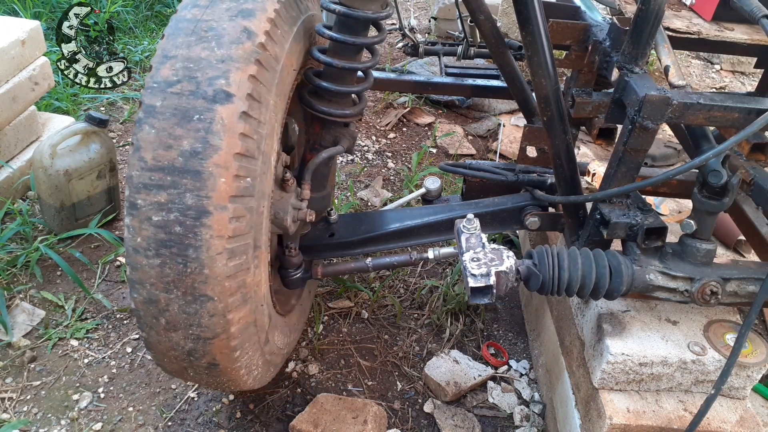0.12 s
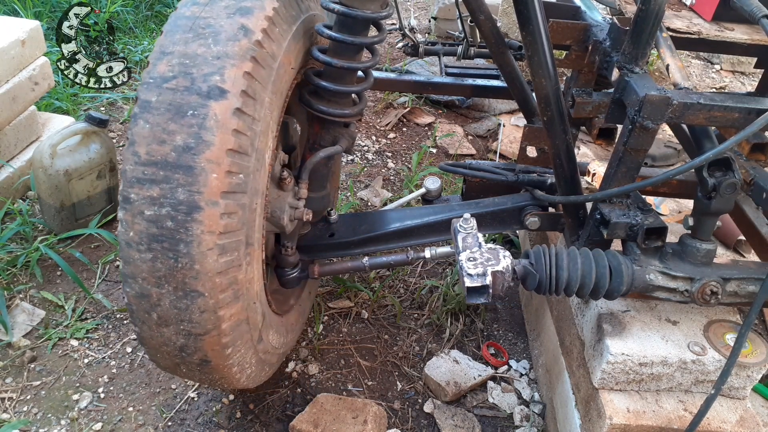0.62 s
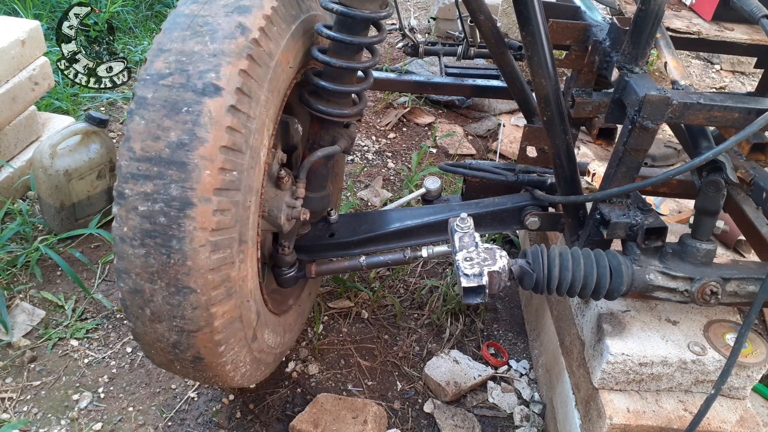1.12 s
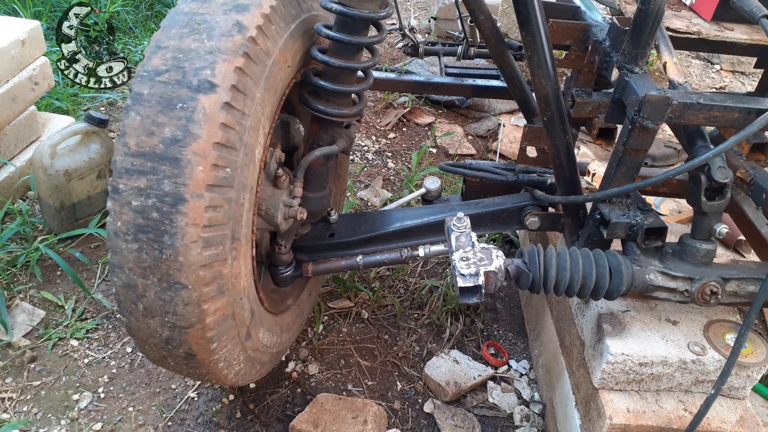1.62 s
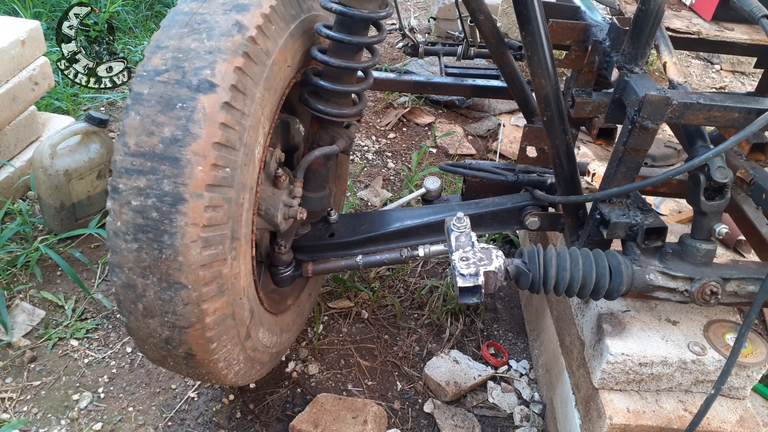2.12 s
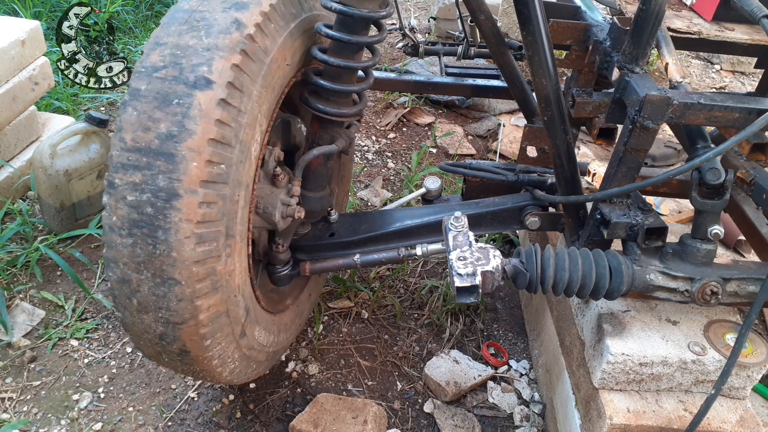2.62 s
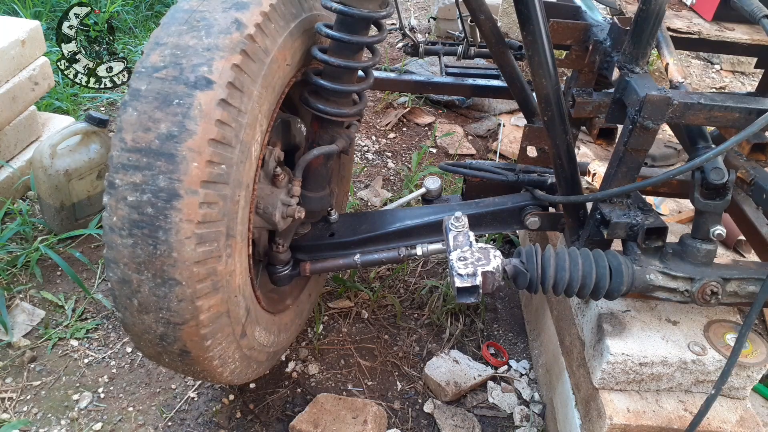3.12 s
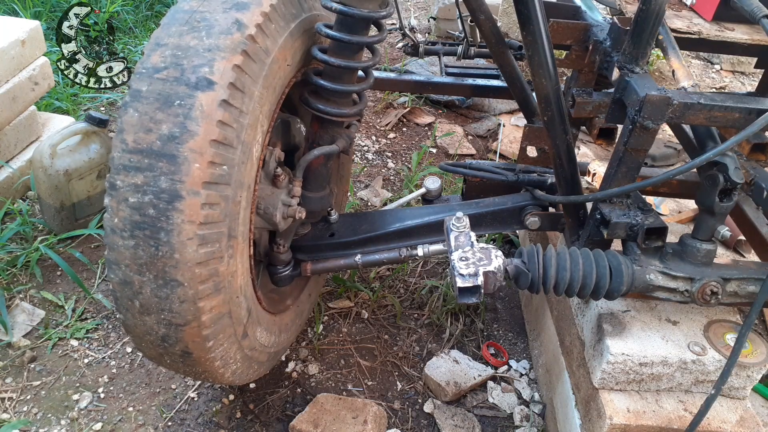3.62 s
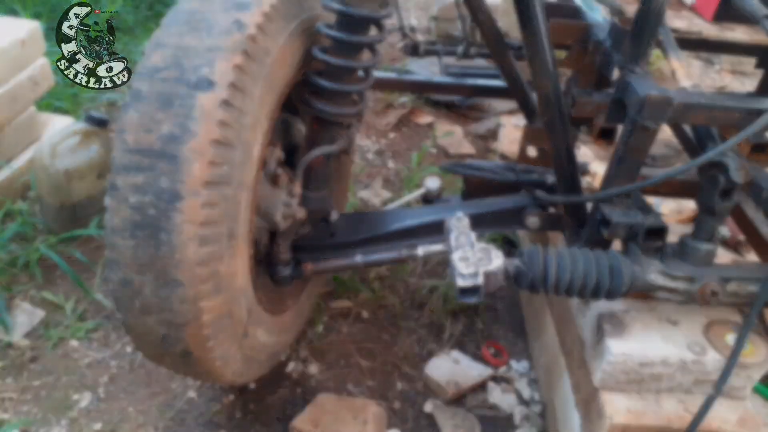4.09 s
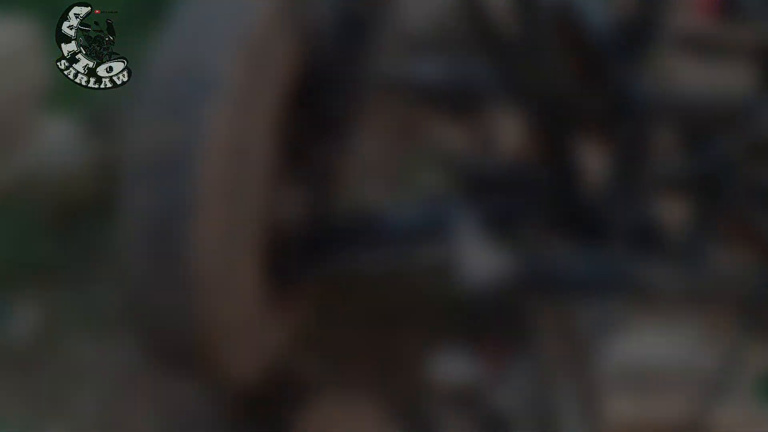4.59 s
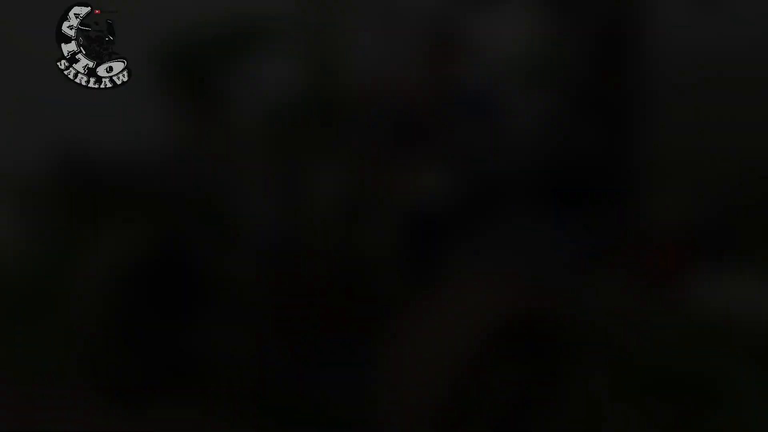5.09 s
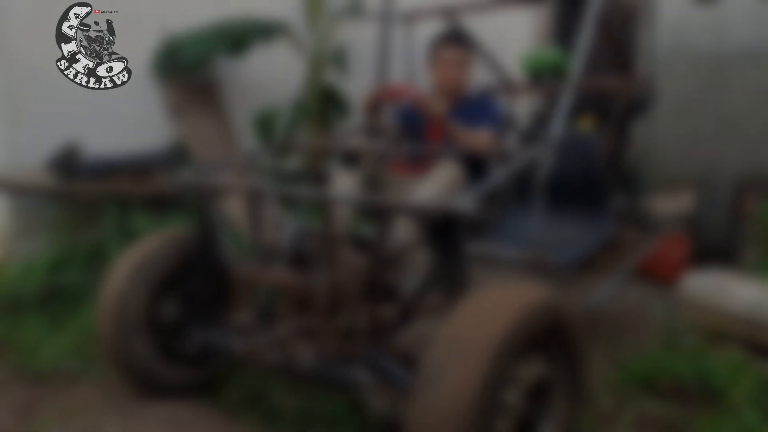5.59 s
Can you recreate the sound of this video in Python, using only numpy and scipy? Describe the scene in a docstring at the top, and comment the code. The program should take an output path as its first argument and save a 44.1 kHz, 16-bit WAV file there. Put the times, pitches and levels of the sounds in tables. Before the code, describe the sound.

A slow, separate putt-putt of a small engine, heard from some way off over faint hiss, with hollow boom and raspy tailpipe bark. Suspension and frame knock over bumps, clanking hardest midway. The engine sags and quietens, then an abrupt edit brings it close: quicker firing, strong boom, rough rush, ringing casing and gliding gear whine, until the end.

```python
"""A small single-cylinder engine putters about a yard some way off, slowing down on the whole. Firing-order
boom with a wall echo, tailpipe bark, rumble and rush follow its speed; filtered noise bursts and decaying
sines make the frame knock and clank over bumps, above a faint hiss. At 5.069 s the sound jumps to the
same engine close by, running faster, with rushing noise, gear whine and clatter ringing the casing."""
import sys
import numpy as np
from scipy import signal
from scipy.fft import rfft, irfft
from scipy.io import wavfile
from scipy.ndimage import uniform_filter1d

SR = 44100
rng = np.random.default_rng(int(sys.argv[2]) if len(sys.argv) > 2 else 0)


def bounce(signal):
    """Save signal as a 16-bit WAV file at the path given by the first command-line argument."""
    frames = np.transpose(np.atleast_2d(signal))
    limited = np.clip(frames, -1, 1)
    pcm = np.round(limited * 32767).astype(np.int16)
    wavfile.write(sys.argv[1], SR, pcm)


def boost(x):
    """Linear amplitude factor 10**(x/20) for a level x in decibels (scalar or array-like)."""
    u = np.asarray(x, float) / 20
    return 10 ** u


N = 252252


def evened(x):
    """Scales to rms 1."""
    return x / np.sqrt(np.mean(x ** 2) + 1e-20)


def read(points, hz):
    """Reads a spectrum on a log frequency axis."""
    f, value = np.transpose(points)
    return np.interp(np.log(hz + 1), np.log(f + 1), value)


def curves(rows, t):
    """Every column of a table at the times t."""
    s, *columns = np.transpose(rows)
    return np.array([np.interp(t, s, c) for c in columns])


def wander(shape, size):
    """Slow random curve of rms 1: white noise averaged over size samples."""
    return evened(uniform_filter1d(rng.standard_normal(shape), size=size))


def resonate(x, hz, width_hz):
    """Two equal resonances of gain 1 in series: each shifts hz to zero, smooths, shifts back."""
    turn = np.exp(2j * np.pi * np.cumsum(hz * np.ones(x.shape[-1])) / SR)
    r = np.exp(-np.pi * width_hz / SR)
    for _ in range(2):
        x = 2 * (turn * signal.lfilter([1 - r], [1, -r], x / turn)).real
    return x


def pair(count):
    """Two white noises whose likeness varies with frequency."""
    # left-right correlation: (frequency [Hz], likeness [-1 to 1])
    likeness = [(60, 0.34), (180, 1), (550, 0.52), (1650, -0.14), (4970, -0.14), (15000, 0.11)]
    a, b = rfft(rng.standard_normal((2, count)))
    same = np.clip(read(likeness, np.fft.rfftfreq(count, 1 / SR)), -1, 1)
    return irfft([a, same * a + np.sqrt(1 - same ** 2) * b], count)


def coloured(x, points):
    """Filters x by the gains of points, then scales to rms 1."""
    gain = boost(read(points, np.fft.rfftfreq(x.shape[-1], 1 / SR)))
    return evened(irfft(rfft(x) * gain, x.shape[-1]))


def cycles(t, part):
    """Firings counted from the start of a stretch, and firing rate in Hz: phase is the integral of rate."""
    # firing rate, far then close: (time [s], rate [Hz])
    firing_rate = [
        [(0.0, 19.59), (0.24, 19.81), (0.48, 18.57), (0.72, 17.91), (0.97, 18.8), (1.21, 17.94), (1.45, 17.88),
         (1.69, 17.91), (1.93, 16.96), (2.17, 15.59), (2.41, 15.44), (2.66, 15.89), (2.9, 15.49), (3.14, 14.7),
         (3.38, 15.66), (3.62, 16.5), (3.86, 16.57), (4.1, 17.27), (4.35, 17.18), (4.59, 16.0), (4.83, 12.9),
         (5.07, 12.2)],
        [(5.07, 22.43), (5.15, 22.51), (5.23, 22.89), (5.31, 23.92), (5.39, 24.67), (5.47, 24.77),
         (5.55, 24.39), (5.63, 23.85), (5.72, 23.29)],
    ]
    # count at the start, far then close: [firings]
    first_turn = [-.14, -.01]
    firing_hz = curves(firing_rate[part], t)[0]
    return first_turn[part] + np.cumsum(firing_hz) / SR, firing_hz


def puffs(turns, length, steady, spread_db):
    """Envelope that leaps at each firing and dies over length [firings]; every firing has its own strength."""
    strength = boost(spread_db * rng.standard_normal(200))[np.floor(turns + 1).astype(int)]
    return steady + strength * uniform_filter1d(np.exp(-(turns % 1) / length), size=120)


def boom(turns, firing_hz, part, boom_db, thud_level_db, lag_ms, echo, swing, smear, ahead):
    """Muffler boom: harmonics of the firing rate in step, each with a delayed wall echo."""
    # strength of the orders by pitch, far then close: (frequency [Hz], level [dB])
    muffler = [
        [(30, -57), (45, -38.5), (65, -34), (85, -9), (97, -1.5), (110, -2.5), (122, -2), (135, -0.5),
         (150, -17), (175, -24.5), (210, -33)],
        [(30, -45.5), (48, -24.5), (72, -19), (85, -18.5), (97, -17), (110, 2.5), (122, -1), (135, -7),
         (150, -18), (172, -9), (200, -20), (260, -26)],
    ]
    muffler_hz = 121.4
    thud_hz, thud_width_hz = 66.1, 7  # a low mode of the pipe
    out = 0
    for k in range(2, 11):
        hz = k * firing_hz
        order_phase = swing + smear * (k - muffler_hz / firing_hz) ** 2  # cycles
        angle = 2 * np.pi * (k * (turns + ahead) + order_phase)
        late = 2 * np.pi * hz * lag_ms / 1000
        thud = boost(thud_level_db) * np.exp(-((hz - thud_hz) / thud_width_hz) ** 2)
        level = boost(boom_db + read(muffler[part], hz)) + thud
        out = out + level * (np.cos(angle) + echo * np.cos(angle - late))
    return out


def bark(valve_turns, pop, mode_db):
    """Exhaust pops and turbulent gas ring the tailpipe modes."""
    # pipe resonances: (frequency [Hz], width of each pass [Hz], level [dB])
    tailpipe = [(178.6, 88, -9), (238.8, 50, -3), (294.3, 48.3, 0.5), (429, 110, -15.5)]
    revs = np.floor(2 * valve_turns + 2).astype(int)  # two crank turns a firing
    strength_db = 0.76 * rng.standard_normal(400) - 5 * (np.arange(400) % 2)  # the idle turn pops weaker
    pops = np.diff(revs, prepend=revs[0]) * boost(strength_db)[revs]
    # gas is harder just after the valve opens
    gas = pair(len(valve_turns)) * puffs(valve_turns, 1.0, 1.0, 1.6)
    drive = pop * evened(pops) + evened(gas)
    modes = tailpipe + [(325.4, 54, mode_db)]  # the last is the upper pipe mode
    return evened(sum((-1) ** k * boost(db) * resonate(drive, hz, width_hz)
                      for k, (hz, width_hz, db) in enumerate(modes)))


def rumble(count, db):
    """Low noise, shaped by a fixed spectrum."""
    # (frequency [Hz], relative spectral level [dB per Hz])
    rumble_colour = [(25, -29), (45, 15), (70, 12.5), (120, 27.5), (200, 9.5), (300, -29.5)]
    return boost(db) * coloured(pair(count), rumble_colour)


def rush(valve_turns, colour, gated, gusts_db, level_db):
    """Broad noise gusting with each firing."""
    gusts = pair(len(valve_turns)) * puffs(valve_turns, 0.86, 1 / gated, gusts_db)
    return boost(level_db) * coloured(gusts, colour)


def engine(t, part, colour, swing, lead, pop, gated, uneven_db, rumble_db, gusts_db,
           smear, ahead, pan_db, rush_db, rush_share):
    """Boom, bark, rumble and rush; all but the rumble's waveform are tied to the firing."""
    # far then close: (time [s], muffler boom [dB], exhaust rasp [dB], lag of the wall echo [ms])
    drive_rows = [
        [(0.0, -31, -48, 23.6), (0.25, -35, -45, 21.3), (0.5, -36, -48.5, 19.4), (0.75, -35.5, -48, 20.3),
         (1.05, -33.5, -47.5, 19.4), (1.4, -31.5, -46.5, 19.7), (1.7, -38, -48.5, 17.9), (2.0, -31, -48, 19.4),
         (2.25, -35.5, -46.5, 16.4), (2.5, -34.5, -44.5, 15.4), (2.75, -39, -43.5, 13.9),
         (2.9, -36, -46.5, 18.8), (3.15, -42.5, -43, 13.5), (3.55, -35.5, -41, 14.35), (3.8, -37, -44, 13.3),
         (4.0, -45.5, -46.5, 15.4), (4.3, -47.5, -45.5, 15.6), (4.6, -49, -51, 17.3), (5.07, -49, -48.5, 19.8)],
        [(5.09, -26.5, -41.5, 12), (5.14, -19, -36.5, 8.9), (5.19, -26.5, -34.5, 5.5), (5.25, -17, -39.5, 12),
         (5.3, -22.5, -38, 44), (5.42, -20.5, -37, 18), (5.6, -20.5, -38, 16), (5.72, -16.5, -41.5, 9.9)],
    ]
    # the machine turns, so wall and tailpipe face the listener differently; far then close:
    # (time [s], share of wall echo [0-1], upper pipe mode [dB], low pipe mode over rasp [dB])
    heading = [
        [(0.0, 0.54, 2, -11), (.6, 0.77, 0.5, -11.5), (1.3, 0.77, 1, -13), (1.9, 0.54, 4, -12),
         (2.4, 0.68, 1.5, -20), (2.75, 0.82, 7, -13), (3.1, 0.43, 3, 1), (3.5, 0.6, -1, -12),
         (3.9, 0.57, 2, -6), (4.3, 0.44, 7.5, -0.5), (4.6, 0.37, -1.5, -7), (5.07, 0.3, 0, -15)],
        [(5.07, 0, -6, -17), (5.25, 0.08, -21, -12), (5.4, .05, -2.5, -12), (5.72, 0.03, -5.5, -15)],
    ]
    turns, firing_hz = cycles(t, part)
    boom_db, rasp_db, lag_ms = curves(drive_rows[part], t)
    echo, mode_db, thud_db = curves(heading[part], t)
    valve_turns = turns + lead
    pan = boost([[pan_db / 2], [-pan_db / 2]])
    uneven = boost(uneven_db * wander(len(t), 2500))
    low = boom(turns, firing_hz, part, boom_db, rasp_db + thud_db, lag_ms, echo, swing, smear, ahead)
    rasp = bark(valve_turns, pop, mode_db) + rumble(len(t), rumble_db)
    rush_level_db = rush_db + rush_share * (rasp_db - rasp_db.mean())
    return pan * low * uneven + boost(rasp_db) * rasp + rush(valve_turns, colour, gated, gusts_db, rush_level_db)


def clatter(t):
    """Valve clatter, repeating each cycle as harmonics of random phase, plus band noise."""
    turns, _ = cycles(t, 1)
    ticks = sum(np.cos(2 * np.pi * (k * turns + rng.random((2, 1)))) for k in range(18, 120))
    band = signal.butter(2, [400, 3000], "band", fs=SR)
    return evened(ticks) + 0.56 * evened(signal.lfilter(*band, pair(len(t))))


def casing(drive):
    """Clatter rings the casing modes; each swells and sinks by chance."""
    # modes of the engine casing: (frequency [Hz], width of each pass [Hz], relative level [dB])
    modes = [(478, 36, -4.5), (600, 47, -3), (742, 64, -6), (822, 35, -8), (885, 24, -0.5), (942, 18, -0.5),
             (1043, 53, -2), (1329, 36, -7.5), (1490, 36, 0.5), (1550, 57, -2), (1668, 39, -0.5),
             (1845, 45, -3), (1982, 57, -4.5), (2270, 30, -7)]
    flare = boost(3 * wander((len(modes), drive.shape[-1]), 4000))  # 3 dB rms
    out = sum(boost(db) * swell * evened(resonate(drive, hz, width_hz))
              for (hz, width_hz, db), swell in zip(modes, flare))
    return boost(-47) * out


def gear_whine(t, drive):
    """Clatter drives two narrow gliding resonances, the second at 1.83 times the pitch of the first."""
    # first whine: (time [s], frequency [Hz], level [dB])
    whine_rows = [(5.075, 895, -57.5), (5.137, 804, -41.5), (5.197, 887, -42.5), (5.399, 995, -36),
                  (5.409, 1027, -40), (5.543, 962, -37), (5.72, 942, -42.5)]
    hz, db = curves(whine_rows, t)
    first = evened(resonate(drive, hz, 76))
    second = boost(-6.5) * evened(resonate(drive, 1.83 * hz, 80))
    return boost(db) * (first + second)


def burst(db, colour, t60_s, rise_s):
    """Noise that starts with a crack and dies away in the echoes of the yard."""
    t = np.arange(SR // 2) / SR
    attack = np.minimum(t / max(rise_s, 1 / SR), 1)
    decay = 0.65 * boost(-60 * t / t60_s) + 0.53 * np.exp(-t / (0.011 + rise_s))
    return boost(db) * coloured(pair(len(t)), colour) * attack * decay


def knock(db, hz, t60_s, rise_s):
    """A dull blow or tick: a broad hump of colour with a hollow peak on top."""
    f = np.geomspace(100, 20000, num=120)
    away_oct = np.log2(f / hz)
    breadth_oct = 0.64 * (hz / 1000) ** 0.2  # brighter knocks are broader
    breadth_oct = np.where(away_oct < 0, 2.0 * breadth_oct, breadth_oct)  # more body below the hump
    colour_db = -6 * (away_oct / breadth_oct) ** 2 + 5 * np.exp(-(away_oct / 0.21) ** 2)
    return burst(db, np.transpose([f, colour_db]), t60_s, rise_s)


def clank(db, t60_s, ring_db):
    """A sharp crack that sets the steel frame ringing; modes above 400 Hz differ in phase between the ears."""
    # modes of the frame: (frequency [Hz], relative level [dB], t60 [s])
    frame_modes = [(229, 4, 0.19), (319, 2, 0.26), (537, -6, 0.53), (950, -8, 0.54), (1700, -7, .1),
                   (1880, 1, 0.13), (5030, -7, 0.12), (5000, -17, 0.38), (4960, -19, 0.33),
                   (5080, -16, 0.26), (5200, -8, 0.086), (6260, 4, 0.056)]
    # colour of the crack: (frequency [Hz], relative spectral level [dB per Hz])
    crack_colour = [(290, -35), (500, -10), (807, 1), (1420, -2.5), (1790, -0.5), (2980, -10.5),
                    (4870, -7.5), (8090, -16), (9920, -41), (14500, -38), (16000, -93)]
    t = np.arange(SR // 2) / SR
    phase = 2 * np.pi * rng.random((len(frame_modes), 2, 1))
    ring = sum(boost(m_db - 60 * t / m_t60_s) * np.sin(2 * np.pi * m_hz * t + p * (m_hz > 400))
               for (m_hz, m_db, m_t60_s), p in zip(frame_modes, phase))
    ring = boost(db + ring_db) * ring * np.minimum(t / 0.0049, 1)
    # the first contact, bright and short
    tick = boost(db - 16.5) * np.diff(pair(len(t) + 1)) * np.exp(-t / 0.0012)
    return tick + burst(db, crack_colour, t60_s, 0.00056) + ring


def hiss(count):
    """Faint treble noise whose level wanders slightly."""
    # (frequency [Hz], relative spectral level [dB per Hz])
    hiss_colour = [(1760, -42), (3000, -44), (3810, -49), (4700, 7.5), (7460, 16.5), (9460, 9.5),
                   (13800, 4), (16000, -32)]
    return boost(-79 + 0.5 * wander(count, 4000)) * coloured(pair(count), hiss_colour)


def add(mix, s, sound):
    """Mixes a sound in at time s."""
    part = mix[:, round(s * SR):][:, :sound.shape[1]]
    part += sound[:, :part.shape[1]]


def scene():
    """Far engine with knocks and clanks over a faint hiss, then the close engine."""
    # colours of the rush, far and close: (frequency [Hz], relative spectral level [dB per Hz])
    far_colour = [(250, -31.5), (420, -3), (459, -3.5), (601, 1.5), (967, -8.5), (1550, -13.5), (1700, -11),
                  (1980, -16.5), (3310, -22.5), (4280, -27.5), (8120, -24.5), (9000, -29), (11700, -73),
                  (19800, -120)]
    near_colour = [(240, -37), (400, -33), (496, -10.5), (801, -6.5), (949, -13.5), (1160, -8.5),
                   (1630, -8), (3260, -16), (8370, -20), (10200, -27), (14600, -24.5), (16000, -27)]
    # dull knocks and ticks: (time [s], level [dB], colour [Hz], t60 [s], rise [s])
    knock_rows = [(0.202, -54, 2500, 0.34, 0.0015), (0.591, -63.5, 5398, 1, 0.0076),
                  (.81, -52, 770, 0.31, 0.014), (0.902, -62, 3650, 0.42, .03),
                  (.938, -55.5, 1890, 0.33, 0.003), (1.57, -66, 4030, 0.49, 0.012),
                  (1.906, -60, 700.4, .2, .003), (2.27, -58.5, 2100, 0.98, 0.06),
                  (2.39, -46.5, 600, 0.14, 0.0068), (2.539, -42.5, 1210, 0.11, 0.048),
                  (2.865, -51, 800, 0.83, .008), (3.367, -47, 6700, 0.32, 0.0015),
                  (3.38, -49, 1570, 0.89, 0.028), (3.771, -53, 890, 0.17, 0.0038),
                  (4.188, -48.5, 1900, 0.26, 0.0098), (4.437, -65.5, 8700, 0.26, .002),
                  (4.761, -56, 2140, 0.41, 0.0045), (4.812, -48, 635, 0.093, 0.0045),
                  (4.932, -55, 2280, 0.41, 0.0055)]
    # steel on steel, nearer: (time [s], level [dB], t60 [s], ring over crack [dB])
    clank_rows = [(3.281, -41.5, 0.25, -10), (3.477, -29, 0.22, -3.5)]
    close_s = 5.069
    t, cut = np.arange(N) / SR, round(close_s * SR)
    # swing in cycles; lead and ahead in firings
    far = engine(t[:cut], 0, far_colour, swing=0.38, lead=0.1029, pop=0.4, gated=0.31, uneven_db=1.12,
                 rumble_db=-1, gusts_db=7.5, smear=0.035, ahead=0.13,
                 pan_db=3.5, rush_db=-58.0, rush_share=0.93)
    for s, *blow in knock_rows:
        add(far, s, knock(*blow))
    for s, *blow in clank_rows:
        add(far, s, clank(*blow))
    far += hiss(cut)
    near = engine(t[cut:], 1, near_colour, swing=-.03, lead=0.1545, pop=0.5, gated=0.51, uneven_db=1.94,
                  rumble_db=-3.5, gusts_db=1.5, smear=.056, ahead=0.0078,
                  pan_db=1.0, rush_db=-37.5, rush_share=0.28)
    drive = clatter(t[cut:])
    near += casing(drive) + gear_whine(t[cut:], drive)
    fade_in = np.minimum(np.arange(N - cut) / 40, 1)
    return np.hstack([far, near * fade_in])


def top_cut(x):
    """Nothing passes above the cut-off."""
    return signal.sosfilt(signal.butter(12, 16420, fs=SR, output="sos"), x)


def record(dry):
    """The microphone loses the deepest bass; its two ports differ in level by frequency."""
    # (frequency [Hz], left over right [dB])
    sides = [(60, -7), (250, -1.9), (700, -1.5), (2000, -4.5), (8000, -2.5), (15000, -1)]
    hz = np.fft.rfftfreq(N, 1 / SR)
    tilt_db = read(sides, hz) / 2
    bass_cut = hz ** 2 / np.sqrt(hz ** 4 + 38 ** 4)
    ports = boost(np.array([tilt_db, -tilt_db])) * bass_cut
    mix = irfft(rfft(dry) * ports, N)
    return top_cut(mix)


dry = scene()
out = record(dry)
bounce(out)
```